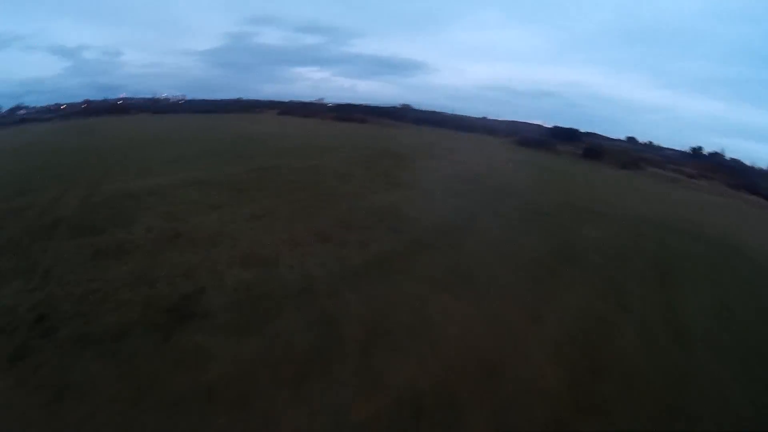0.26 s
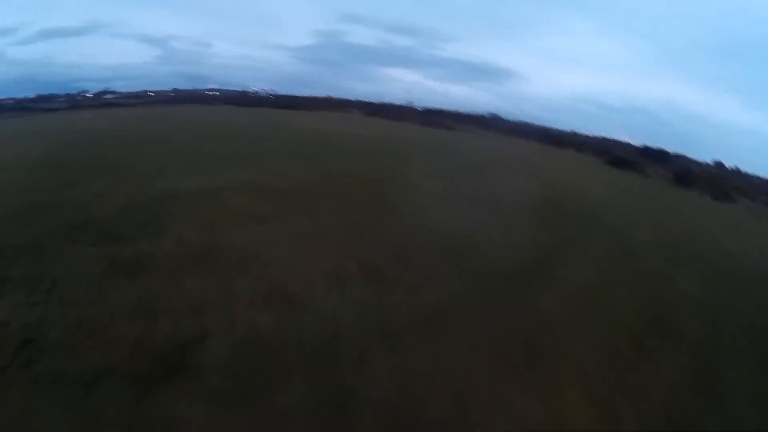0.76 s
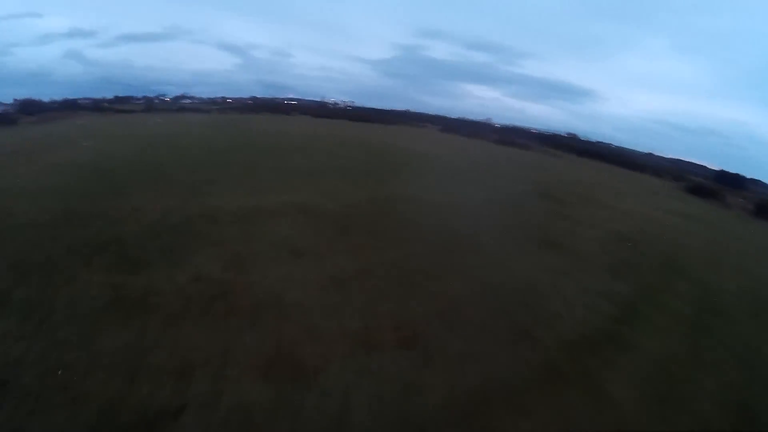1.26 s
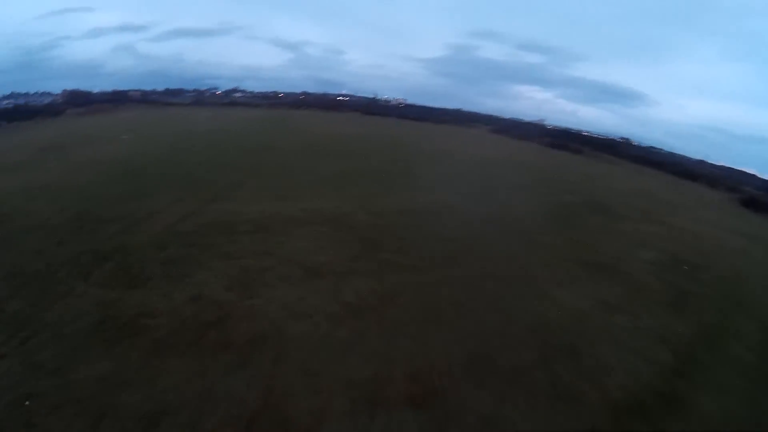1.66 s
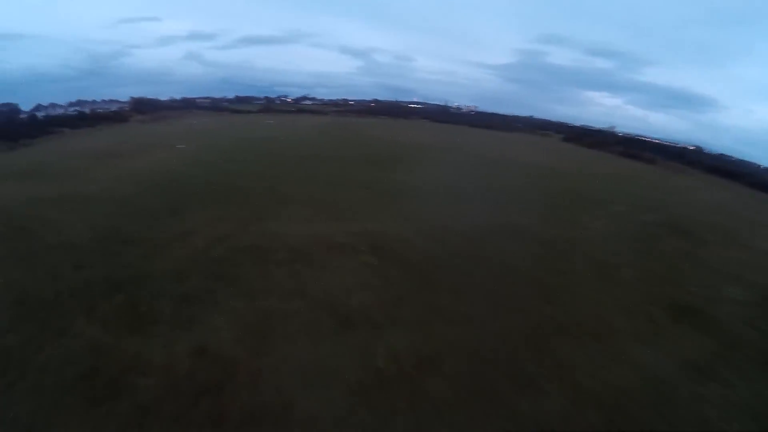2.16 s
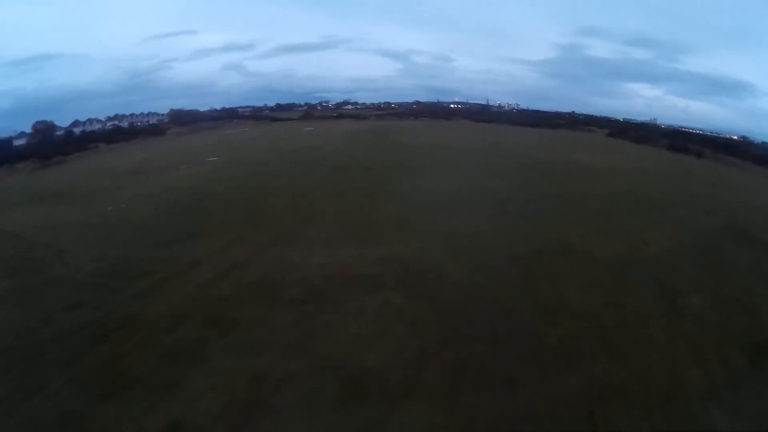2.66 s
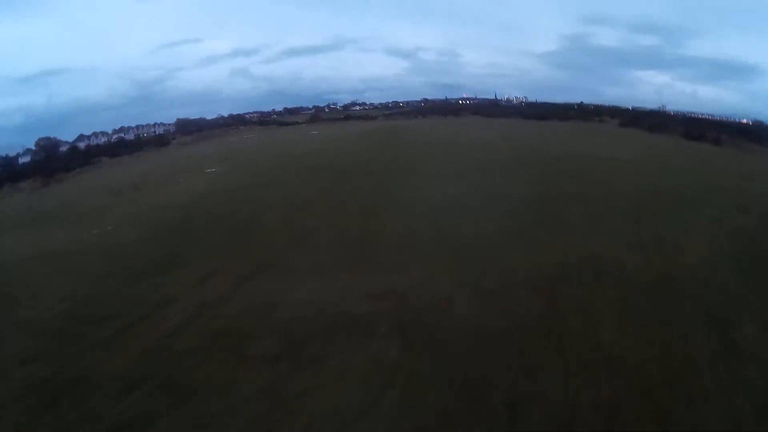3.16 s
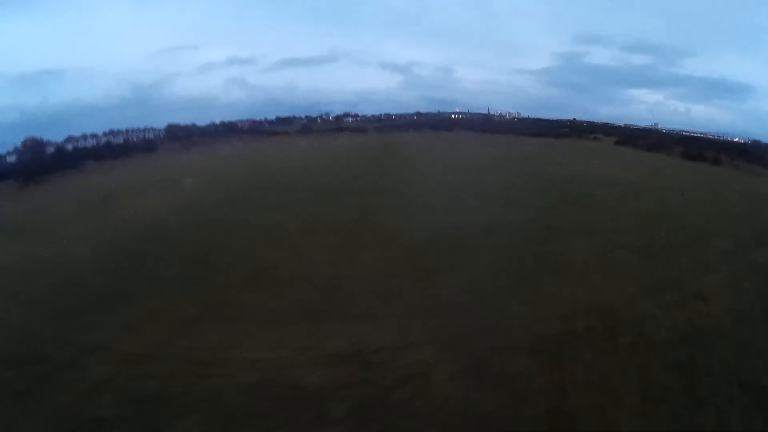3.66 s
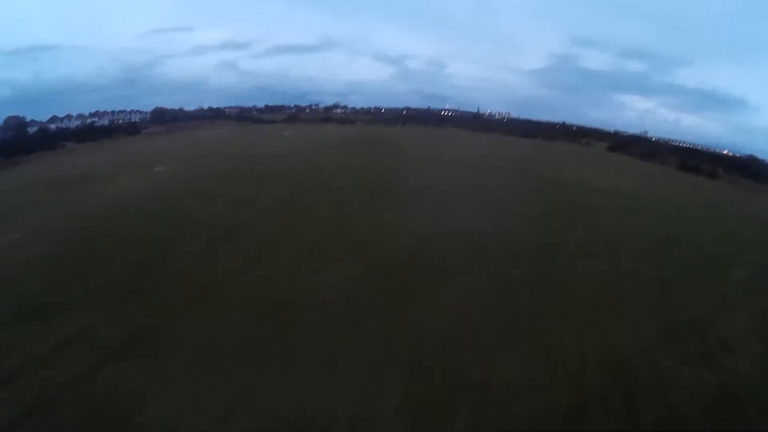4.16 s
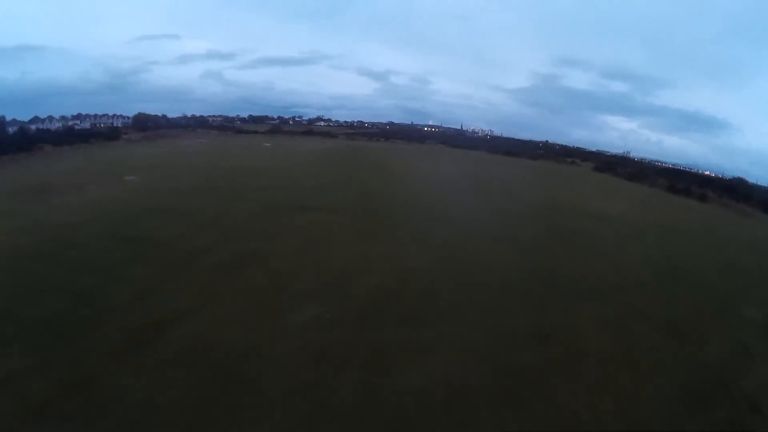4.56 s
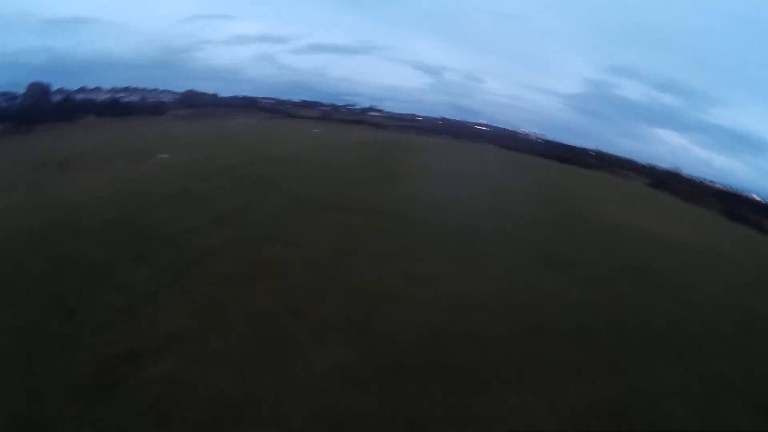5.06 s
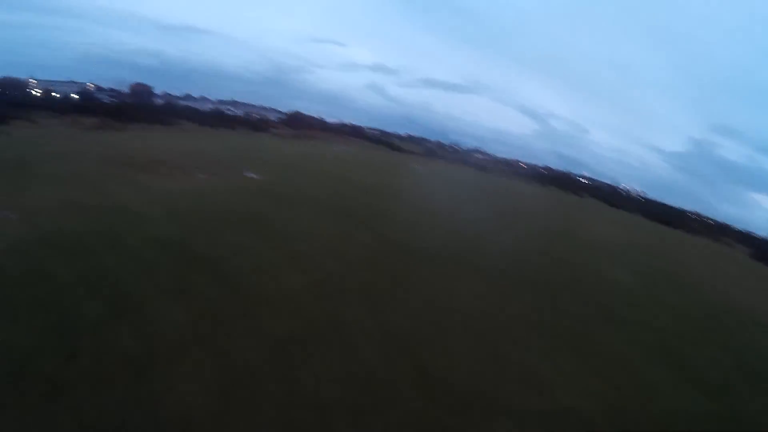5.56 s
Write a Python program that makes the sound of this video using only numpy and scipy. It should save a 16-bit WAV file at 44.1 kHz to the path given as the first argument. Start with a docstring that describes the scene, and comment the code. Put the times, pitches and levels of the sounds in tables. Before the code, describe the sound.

A quadcopter flies over an open field, heard from the microphone of its onboard camera. Four close propellers make a continuous buzzing hum, their pitches wavering and beating against each other above a rush of air. As it turns, low wind rumble builds on the microphone, then drops away. A faint high whine, a thin hiss and light ticks from the shaking camera mount run underneath.

```python
"""An open field, heard from the microphone of a camera bolted to a banking quadcopter.
Close by, four two-bladed rotors beat against each other above the rush of their own wash.
Air hisses past the case, the speed controllers whine faintly and the shaken camera mount ticks.
In mid-turn wind buffets the microphone, and one motor sings whenever it meets a frame resonance."""
import sys
import numpy as np
from scipy import signal
from scipy.fft import rfft, irfft, next_fast_len
from scipy.io import wavfile
from scipy.ndimage import uniform_filter1d

SR = 44100
rng = np.random.default_rng(int(sys.argv[2]) if len(sys.argv) > 2 else 0)


def master(y):
    """Save y as 16-bit WAV."""
    cut = np.clip(np.atleast_2d(y).T, -1, 1)
    pcm = np.round(cut * 32767)  # scale
    wavfile.write(sys.argv[1], SR, pcm.astype(np.int16))


N = 256650
TIME = np.arange(N) / SR

# Steering of the four rotors: to turn, A and D speed up while B and C slow down.
# Each row: time in seconds, shaft speed in turns per second.
SPEED_A = [(0.0, 100.0), (0.56, 101.0), (0.77, 104.0), (0.92, 102.3), (1.15, 104.7), (1.52, 101.5),
           (1.62, 105.5), (1.87, 107.1), (2.54, 107.1), (2.83, 110.5), (2.99, 106.6), (3.26, 109.9),
           (3.42, 106.7), (4.16, 106.6), (4.39, 102.5), (4.95, 99.1), (5.38, 105.4), (5.82, 101.7)]
SPEED_B = [(0.0, 101.5), (0.59, 101.7), (1.05, 97.5), (1.17, 99.6), (1.55, 97.0), (1.67, 99.1),
           (2.18, 93.4), (3.09, 91.6), (4.0, 95.1), (4.47, 102.3), (5.44, 104.7), (5.82, 102.2)]
SPEED_C = [(0.0, 88.9), (0.57, 92.5), (1.44, 88.5), (1.76, 92.0), (2.48, 86.1), (2.9, 88.9), (3.3, 83.8),
           (3.7, 88.1), (3.85, 87.0), (4.03, 90.3), (4.28, 87.3), (4.51, 90.0), (5.24, 91.3), (5.82, 84.8)]
SPEED_D = [(0.0, 71.8), (0.58, 75.9), (1.42, 76.6), (2.34, 81.8), (2.59, 84.2), (3.16, 84.1), (4.11, 80.3),
           (4.74, 70.6), (5.37, 74.7), (5.82, 70.8)]
# Rotor tones: even orders are blade passes, odd ones come from unbalance.
# Each row: shaft order, then rms level in dB of rotors A, B, C and D, before frame and wind act on it.
ROTOR_TONES = [ (1, -35, -43.5, -49, -55), (2, -24.5, -30, -28.5, -34.5), (3, -46.5, -61, -58, -51.5),
               (4, -36, -41.5, -34.5, -44.5), (5, -52, -44, -60, -43.5), (6, -33.5, -35.5, -32, -44.5),
               (7, -61.5, -41, -47, -58), (8, -37, -42, -40.5, -40), (9, -64, -58, -46.5, -48),
               (10, -45, -44.5, -51, -65.5), (12, -53.5, -46.5, -66, -50.5), (14, -49, -54, -55.5, -48),
               (16, -57.5, -55.5, -48, -49)]
# Resonances and one notch between motors and microphone. Each row: centre in Hz, width in Hz, gain in dB.
FRAME_RESONANCES = [(390.4, 66, 4.5), (518, 52, -7), (580, 75, 5), (828, 47, 7), (1002, 54, 6)]
# Air torn by the blades. Each row: time in seconds, relative level in dB.
WASH_LEVELS = [(0, -37.5), (.6, -35.5), (1.6, -35), (3.4, -36), (4.9, -36), (5.4, -34), (5.82, -35.5)]
# Spectra of the wash and of air passing the case. Each row: frequency in Hz, relative density in dB.
WASH_SPECTRUM = [(30, -4.5), (120, 0.5), (300, -1.5), (500, 0.5), (740, 2), (930, -1.5), (1150, -3),
                 (1500, -8.5), (2200, -14), (3000, -27.5), (3500, -26), (4000, -31), (4700, -24.5),
                 (5250, -38.5), (7000, -46), (16000, -70)]
HISS_SPECTRUM = [(3000, -15), (6000, -16), (7500, 1.5), (9000, -1), (10000, 1.5), (10600, 7.5), (11800, 3),
                 (13000, -6), (13700, -5), (14600, -4.5), (16000, -7.5)]
# Switching tones of speed controllers A to D. Each entry: frequency in Hz; below it, level in dB.
CONTROLLER_HZ = [7811.9, 7819.9, 7823.5, 7824.68]
CONTROLLER_DB = [-83, -71.5, -85, -71]
# Loudest ticks of the camera mount. Each row: start in seconds, relative peak level in dB.
MOUNT_TICKS = [(0.51, -35), (0.853, -33), (1.1722, -32), (2.2458, -33), (2.3915, -32), (2.4054, -33),
               (3.69, -32.5), (3.8801, -32.5), (4.0856, -38), (4.3355, -35), (4.6807, -30.5), (4.8916, -31),
               (4.8967, -32), (5.5732, -35)]
# Ring of the mount. Each row: frequency in Hz, relative level in dB, seconds to fall by 60 dB.
MOUNT_RESONANCES = [(3630, 2, 0.005), (4050, 10.5, 0.0023), (4270, 2.5, 0.0053), (6800, -14, 0.0011)]
# Wind builds through the turn and drops as it ends. Each row: time in seconds, relative level in dB.
WIND_LEVELS = [(0, -48), (1.2, -37), (2.0, -30.5), (3.0, -29), (4.0, -31), (4.4, -46.5), (5.82, -58)]
# Spectrum of wind on the microphone. Each row: frequency in Hz, relative density in dB.
WIND_SPECTRUM = [(8, -22), (22, -5), (45, -4), (85, 0), (125, -1.5), (165, -2.5), (250, -7), (400, -11),
                 (800, -34.5), (2000, -38), (8000, -88)]


def amp(db):
    """Decibels to gain."""
    return 10 ** (np.asarray(db) / 20)


def unit(x):
    """Scales to rms 1."""
    return x / np.sqrt(np.mean(x ** 2) + 1e-20)


def curve(rows):
    """Joins rows of time and value by straight lines."""
    return np.interp(TIME, *np.transpose(rows))


def noise(spectrum):
    """Noise of rms 1, shaped by rows of frequency and level."""
    hz, db = np.transpose(spectrum)
    size = next_fast_len(N)
    bin_hz = np.fft.rfftfreq(size, 1 / SR)
    gain = amp(np.interp(np.log(bin_hz + 1), np.log(hz), db))
    return unit(irfft(rfft(rng.standard_normal(size)) * gain, size)[:N])


def wander(hz):
    """Smooth random drift of rms 1, mostly slower than hz."""
    slow_t = np.arange(0, N + 64, 64) / SR
    bin_hz = np.fft.rfftfreq(len(slow_t), slow_t[1])
    white = rfft(rng.standard_normal(len(slow_t)))
    drift = irfft(white / (1 + (bin_hz / hz) ** 2), len(slow_t))
    return unit(np.interp(TIME, slow_t, drift))


def shaft_speed(steering, trim=0.003006):
    """The steering curve plus small random trims, like those that keep the craft level."""
    return curve(steering) * (1 + trim * wander(hz=5))


def shaft_angle(speed, gust):
    """Angle of a shaft whose speed trembles with the air that its blades meet."""
    tremble = (.002 + .0025 * gust) * wander(hz=22)
    return 2 * np.pi * np.cumsum(speed * (1 + tremble) / SR) + rng.uniform(0, 2 * np.pi)


def frame_db(hz):
    """Lift or cut of a tone on its way through the frame to the microphone."""
    return sum(db / (1 + (2 * (hz - centre) / width) ** 2) for centre, width, db in FRAME_RESONANCES)


def rotor(speed, angle, levels_db, gust, gust_loss_db=4):
    """A close propeller: its tones swell across frame resonances; rough air weakens the upper ones."""
    out = np.zeros(N)
    for (order, *_), db in zip(ROTOR_TONES, levels_db):
        upper = np.clip((order - 2) / 6, 0, 1)
        tone = np.sqrt(2) * np.cos(order * angle + rng.uniform(0, 2 * np.pi))
        # uneven inflow makes the blade loading flutter, most in the upper orders
        loading = 1 + (.08 + .12 * upper) * wander(hz=25)
        heard_db = db + frame_db(order * speed) - gust_loss_db * gust * upper
        out += amp(heard_db) * loading * tone
    return out


def wash(angles, gain_db=7.5, chop=0.11, swirl_db=0.77):
    """Turbulent air right under the rotors, chopped at every blade pass."""
    blade_passes = 1 + chop * sum(np.cos(2 * angle) for angle in angles)
    level_db = curve(WASH_LEVELS) + gain_db + swirl_db * wander(hz=30)
    return amp(level_db) * unit(noise(WASH_SPECTRUM) * blade_passes)


def case_hiss(level_db=-65):
    """Thin hiss of air past the camera case."""
    return amp(level_db) * noise(HISS_SPECTRUM)


def controllers(angles, octave_db=-20, ripple=0.21, in_phase_s=.104):
    """Four nearly equal switching tones beat slowly; each turning shaft ripples its own tone."""
    out = np.zeros(N)
    for hz, db, angle in zip(CONTROLLER_HZ, CONTROLLER_DB, angles):
        phase = 2 * np.pi * hz * (TIME - in_phase_s)
        tone = np.cos(phase) + amp(octave_db) * np.cos(2 * phase)
        load = 1 + ripple * (np.cos(angle) + np.cos(2 * angle))
        out += amp(db) * np.sqrt(2) * load * tone
    return out


def mount_rattle(knocks_per_s=100, small_db=-45, spread_db=3.9, tick_gain_db=3, clumping=.65):
    """The shaken mount rattles at the microphone in short bouts: a few clear ticks among small knocks."""
    t = np.arange(512) / SR
    ring = sum(amp(db - 60 * t / t60) * np.sin(2 * np.pi * hz * t) for hz, db, t60 in MOUNT_RESONANCES)
    ring *= 1 - np.exp(-t / 0.0002)  # 0.2 ms attack
    bouts = np.exp(clumping * np.minimum(wander(hz=9), 2))
    sizes = amp(small_db + spread_db * np.minimum(rng.exponential(1, N), 2.6))
    chance = knocks_per_s / SR * bouts / bouts.mean()
    knocks = sizes * (rng.random(N) < chance)
    for start, db in MOUNT_TICKS:
        knocks[round(start * SR)] += amp(db + tick_gain_db)
    return signal.oaconvolve(knocks, ring / abs(ring).max())[:N]


def wind_buffet(gain_db=6.0, lumps_db=.8):
    """Rolling rumble of air striking the camera's microphone."""
    level_db = curve(WIND_LEVELS) + gain_db + lumps_db * wander(hz=10)
    return amp(level_db) * noise(WIND_SPECTRUM)


def motor_song(speed, angle, order=56, frame_hz=4765, width_hz=90, loudest_db=-55):
    """A magnetic order of the 14-pole motor sings near a frame resonance, fading as it coasts down."""
    detune = 2 * (order * speed - frame_hz) / width_hz
    acceleration = uniform_filter1d(np.gradient(speed) * SR, size=2000)  # turns per second squared
    current = np.clip(1 + acceleration / 9, .1, 1)
    return amp(loudest_db) * current * np.sqrt(2) * np.cos(order * angle) / (1 + detune ** 2)


def scene(rough_air_db=-32):
    """All at one on-board microphone: four shafts drive tones, wash and whine; wind roughens them."""
    gust = np.tanh(amp(curve(WIND_LEVELS) - rough_air_db))  # 0 in calm air, 1 in rough
    speeds = [shaft_speed(steering) for steering in (SPEED_A, SPEED_B, SPEED_C, SPEED_D)]
    angles = [shaft_angle(speed, gust) for speed in speeds]
    levels_db = np.transpose(ROTOR_TONES)[1:]
    tones = sum(rotor(speed, angle, db, gust) for speed, angle, db in zip(speeds, angles, levels_db))
    whine = controllers(angles) + motor_song(speeds[2], angles[2])  # motor C sings
    return (tones + wash(angles) + wind_buffet() + whine + mount_rattle() + case_hiss())[None]


def record(dry, cutoff_hz=15720):
    """The camera cuts off the highest treble steeply."""
    lowpass = signal.firwin(1601, cutoff_hz, window=("kaiser", 9), fs=SR)
    return signal.oaconvolve(dry, lowpass[None], "same")


dry = scene()
out = record(dry)
master(out)
```